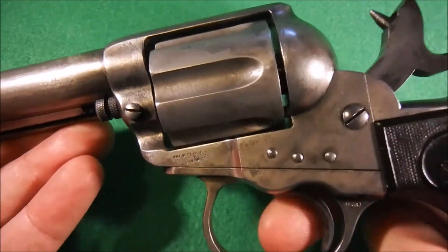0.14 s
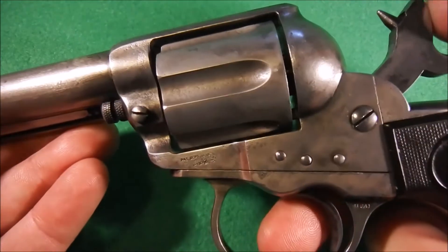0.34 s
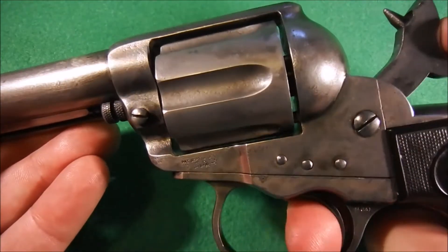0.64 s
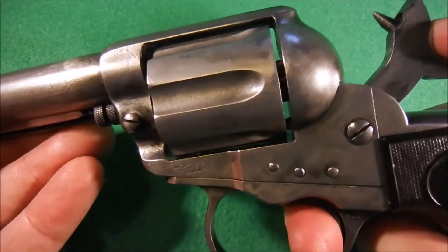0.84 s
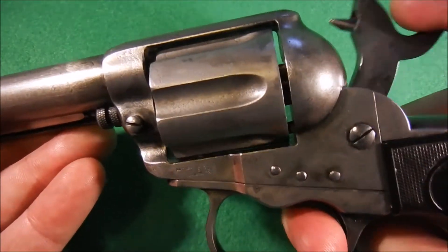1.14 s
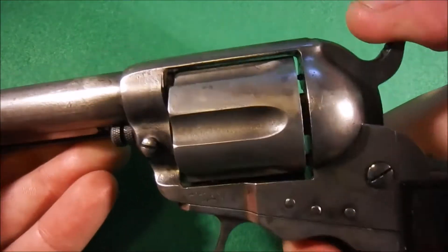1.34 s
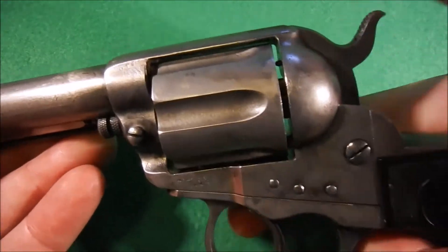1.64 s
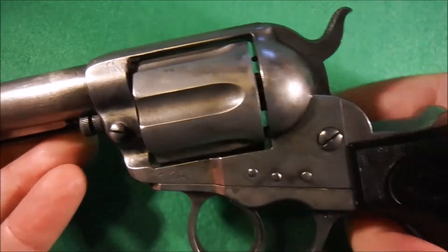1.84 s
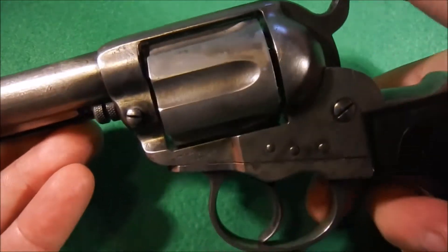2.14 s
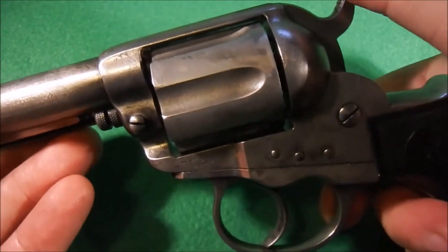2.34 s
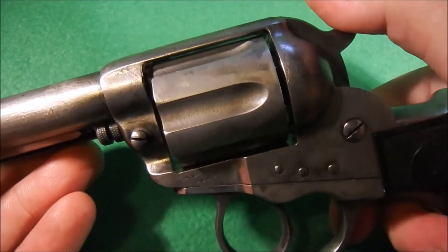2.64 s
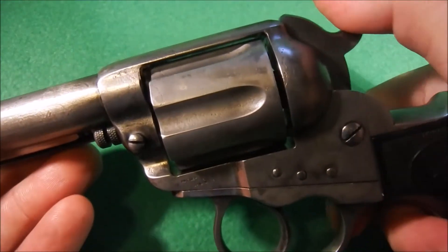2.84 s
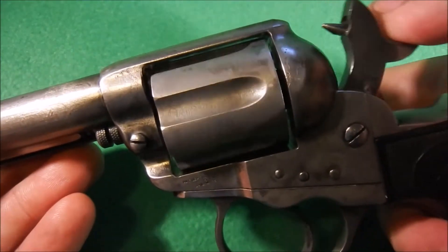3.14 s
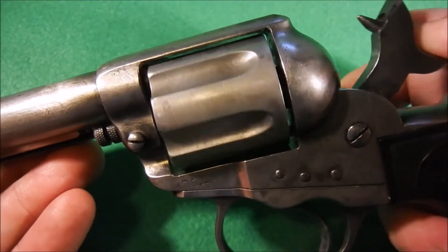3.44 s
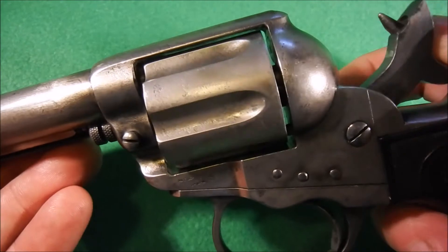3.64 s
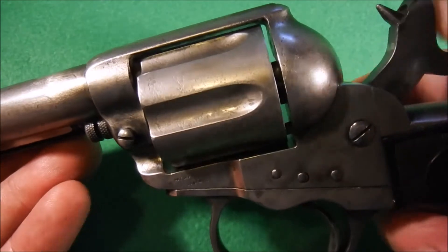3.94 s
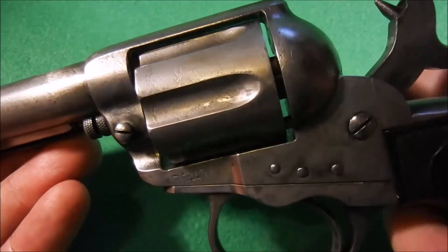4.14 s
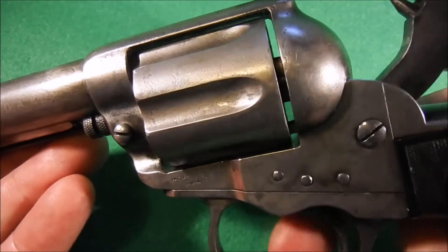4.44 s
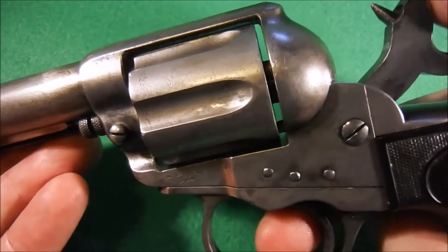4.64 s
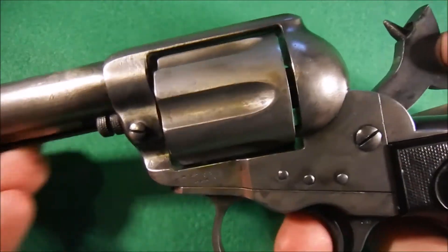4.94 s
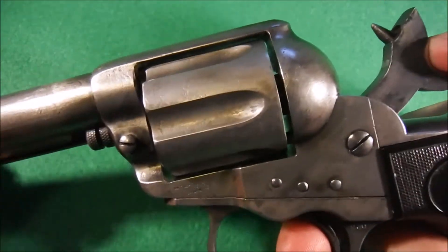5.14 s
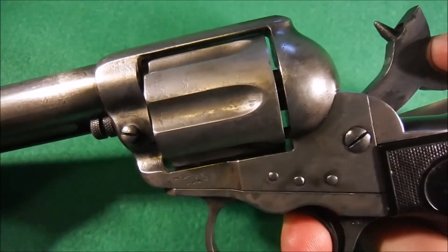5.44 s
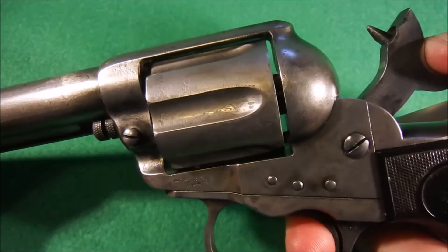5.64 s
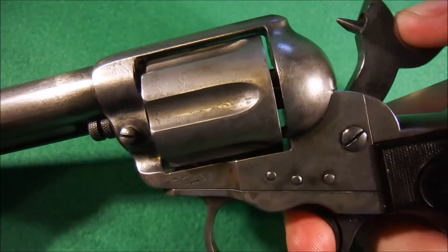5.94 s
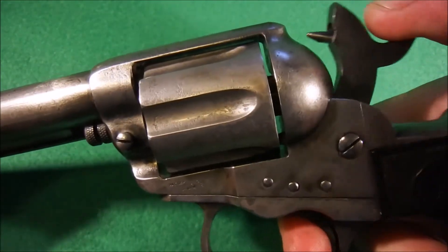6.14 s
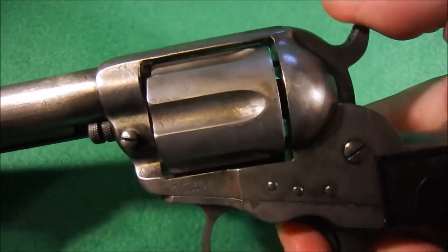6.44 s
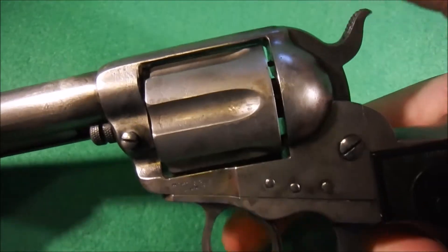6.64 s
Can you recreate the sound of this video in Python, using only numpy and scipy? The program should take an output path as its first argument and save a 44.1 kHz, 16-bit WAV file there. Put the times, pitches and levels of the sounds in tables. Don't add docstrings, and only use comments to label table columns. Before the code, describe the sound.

Close stereo pickup in a quiet room with dull wash, faint fan hum and thin hiss. A palm shuffles softly at the start; fingers rub near 0.2 s. Small lens ticks at 0.75-0.86 lead to a hard double steel click at 0.88 and 0.91. A bright slap lands at 1.43, then a lighter spring scrape and reset click at 1.68-1.71. Tinny focus ticks, about thirty a second, patter faintly until 2.4, then a calm gap. Cocking brings crisp clicks at 3.03, 3.29 and 3.73, with ticking beneath that swells towards 4.7 and fades by 5. Soft finger rubs come around 4.5 and 5.0-5.5. A tight double click snaps at 5.61-5.66, the grip shifts low at 5.9, the hammer seats sharply at 6.54, and a bright springy snap ends it at 6.73. Background drops after loud clicks, then slowly returns; echoes are short and faint.

```python
import sys
import numpy as np
from scipy import signal
from scipy.fft import rfft, irfft
from scipy.io import wavfile
from scipy.ndimage import uniform_filter1d

SR = 44100
rng = np.random.default_rng(int(sys.argv[2]) if len(sys.argv) > 2 else 0)


def undo_db(level):
    steps = np.asarray(level, float) / 20
    return 10 ** steps


def output_pcm(signal):
    pcm = np.clip(np.atleast_2d(signal).T, -1, 1) * 32767
    wavfile.write(sys.argv[1], SR, np.round(pcm).astype(np.int16))


N = 298977

# pitch_hz, left_over_right_db
PORTS = [(300, 6), (2000, -7.5), (4200, -4), (5600, 2), (9000, 5), (13000, 11), (16000, -1)]
# pitch_hz, left_over_right_db
SLOTS = [(4200, -7.5), (4800, -2), (5250, -8), (5750, 0), (6350, 11.5), (6900, -0.5), (9000, -2),
         (15000, 0)]
# pitch_hz, likeness (-1 to 1)
PORT_LIKENESS = [(60, -0.19), (130, 0.32), (290, 0.42), (640, 0.27), (1410, 0.33), (3100, -0.48),
                 (6820, 0.046), (15000, 0.04)]


def evened(x):
    return x / np.sqrt(np.mean(x ** 2) + 1e-20)


def read(points, hz):
    f, value = np.transpose(points)
    return np.interp(np.log(hz + 1), np.log(f + 1), value)


def add(mix, start_s, sound):
    part = mix[:, round(start_s * SR):][:, :sound.shape[1]]
    part += sound[:, :part.shape[1]]


def noise(colour, same=((1, 0), (2, 0)), pan=((1, 0), (2, 0)), patchy_db=0.):
    hz = np.fft.rfftfreq(1024, 1 / SR)
    a, b, c, d, patches = rng.standard_normal((N // 256 + 5, 513, 5)).T
    patches = uniform_filter1d(patches, size=10, axis=0)
    patches = evened(uniform_filter1d(patches, size=14, axis=1))
    like = np.clip(read(same, hz), -1, 1)[:, None]
    left = a + 1j * b
    right = like * left + np.sqrt(1 - like ** 2) * (c + 1j * d)
    tilt_db = np.outer([.5, -.5], read(pan, hz))
    db = (read(colour, hz) + tilt_db)[..., None] + patchy_db * patches
    below_edge = (hz < 15760)[:, None]
    spectra = np.array([left, right]) * undo_db(db) * below_edge
    return evened(signal.istft(spectra, nperseg=1024, noverlap=768)[1][:, :N])


def ring(modes, narrow, facing_db=(0, 0, 0, 0), steep=1):
    facing_hz = [3500, 6500, 10000, 14000]
    hz = abs(np.fft.fftfreq(4096, 1 / SR))
    peak_hz, width_hz, db = np.transpose(modes)[..., None]
    detune = 2 * (hz - peak_hz) / np.maximum(narrow * width_hz, 170)
    power = (undo_db(2 * db) / (1 + detune ** 2) ** steep).sum(0)
    power = power * hz ** 2 / (hz ** 2 + 2300 ** 2)
    tilt_db = read(PORTS, hz) + np.interp(hz, facing_hz, facing_db)
    log_gain = np.log(power + 1e-9) / 2 + np.log(undo_db(np.outer([.5, -.5], tilt_db)))
    spectrum = np.exp(log_gain - 1j * signal.hilbert(log_gain).imag)
    left, right = np.fft.ifft(spectrum).real[:, :1200]
    return np.array([left, np.roll(right, 1)])


def contact(chatter_ms, blow=22, rise=0.025):
    u = np.arange(600) / SR / (chatter_ms / 1000)
    impacts = rng.standard_normal(600) ** 3
    return blow * (u == 0) + impacts * (1 - np.exp(-u / rise)) * np.exp(-u)


def quiet_room():
    # pitch_hz, density_db per Hz
    wash = [(30, -47), (60, -16), (115, -9), (160, -4), (260, -2.5), (500, -4), (800, -7.5), (1300, -2.5),
            (1900, -8), (2250, -16.5), (3000, -14), (4300, -19.5), (5500, -34.5), (7000, -37),
            (10000, -56.5)]
    # pitch_hz, left_over_right_db
    wash_pan = [(200, 1), (1300, -2), (2800, -0.5), (4200, -8.5), (6200, 21), (8000, -4.5)]
    # pitch_hz, density_db per Hz
    hiss = [(3000, -23.5), (6600, -10), (6900, -19), (7150, -9.5), (7450, -15), (7800, -7), (10000, -4),
            (15500, 1.5)]
    # pitch_hz, level_db rms
    fan_lines = [(120, -68), (248, -68.5), (398, -76), (500, -68.5)]
    t = np.arange(N) / SR

    def waver():
        slow = uniform_filter1d(rng.standard_normal(N), size=4000)
        return evened(uniform_filter1d(slow, size=4000))

    out = undo_db(-53) * noise(wash, PORT_LIKENESS, wash_pan, patchy_db=1.5)
    out += undo_db(-64) * noise(hiss, pan=SLOTS, patchy_db=1.5)
    for hz, db in fan_lines:
        out += undo_db(db + 0.5 + 3.0 * waver()) * np.sin(2 * np.pi * hz * t + 1.6 * waver())
    return out


def gain_control_db():
    # start_s, depth_db
    dips = [(.88, -6.5), (.912, -23.5), (1.431, -23), (1.71, -18), (3.034, -14), (3.289, -15),
            (3.734, -12.5), (4.782, 3), (5.614, -6), (5.656, -13), (6.537, -18.5), (6.736, -42)]
    fall_s, hold_s, recover_db_per_s = 0.0067, 0.065, 15
    start_s, depth_db = np.transpose(dips)[..., None]
    since = np.maximum(np.arange(N) / SR - start_s, 0)
    fall = depth_db * (1 - np.exp(-since / fall_s))
    recovery = recover_db_per_s * np.maximum(since - hold_s, 0)
    return np.minimum((fall + recovery).min(0), 0)


def lens_drive():
    # pitch_hz, width_hz, level_db
    case = [(4260, 144, -4.5), (4223, 98, 2.5), (3650, 250, -8), (8100, 1000, -20), (1600, 210, -2)]
    # pitch_hz, density_db per Hz
    whir_colour = [(3000, -32), (3700, -15.5), (4100, -4), (4300, 0), (4600, -8.5), (5200, -32)]
    # start_s, level_db
    first_hunt = [(0.758, -54), (0.79, -52), (0.8255, -45), (0.8581, -49.5), (0.9568, -72), (0.9939, -79.5),
                  (1.0229, -79.5), (1.06, -76.5), (1.0915, -72), (1.1267, -76), (1.1586, -68), (1.193, -73),
                  (1.2255, -67), (1.26, -65.5), (1.2916, -70), (1.325, -66.5), (1.3556, -83.5),
                  (1.3908, -72), (1.4609, -73), (1.493, -65.5), (1.5268, -74), (1.559, -76), (1.5933, -69),
                  (1.6242, -73.0), (1.6577, -72), (1.7228, -58), (1.7604, -70), (1.7926, -73),
                  (1.826, -64.5), (1.8598, -65.5), (1.895, -64.5), (1.9267, -63), (1.959, -66),
                  (1.991, -63.5), (2.024, -67), (2.0605, -59), (2.0934, -58), (2.1262, -59.5),
                  (2.1592, -58.5), (2.192, -61), (2.2263, -61), (2.26, -63.0), (2.2927, -63),
                  (2.3268, -56.5), (2.3621, -89), (2.3933, -56.5)]
    # start_s, level_db
    second_hunt = [(3.061, -66), (3.093, -63.5), (3.129, -59), (3.1613, -64), (3.1954, -57.5),
                   (3.2265, -53), (3.2606, -65), (3.3297, -61), (3.3588, -91), (3.3936, -60),
                   (3.4276, -57.5), (3.4599, -63.5), (3.493, -63.5), (3.5283, -59.5), (3.5579, -72.5),
                   (3.596, -59.0), (3.6276, -60), (3.661, -61), (3.6962, -57.5), (3.7633, -58.5),
                   (3.7943, -63.5), (3.8278, -58), (3.8608, -65), (3.8944, -61), (3.9276, -60),
                   (3.9621, -55), (3.9961, -58.5), (4.06, -54.5), (4.0925, -58.5), (4.1257, -58),
                   (4.1618, -53.5), (4.1945, -51.5), (4.2273, -58), (4.2607, -55.5), (4.2964, -48.5),
                   (4.3277, -50.5), (4.3645, -61), (4.3963, -51), (4.427, -52.5), (4.4615, -51),
                   (4.4959, -53), (4.5265, -56), (4.5625, -47.5), (4.5945, -45), (4.629, -47.5),
                   (4.6617, -46), (4.693, -57), (4.7275, -47.5), (4.7452, -50.5), (4.759, -62),
                   (4.8257, -65), (4.8643, -67.5), (4.8924, -78.0), (4.9283, -77), (4.964, -51),
                   (4.9986, -68)]
    out, whir, t = np.zeros((2, N)), np.zeros(N), np.arange(N) / SR
    bodies = []
    for shift in (-0.026, 0, 0, 0.026):
        modes = [(hz * (1 + shift), width_hz, db) for hz, width_hz, db in case]
        bodies.append(ring(modes, narrow=0.93, steep=1.11))
    for start_s, db in first_hunt + second_hunt:
        step = contact(1.6, blow=8, rise=0.31)[:400]
        shudder = 0.23 * contact(2.7, blow=0, rise=1.0)
        body = bodies[rng.integers(len(bodies))]
        buzz = signal.fftconvolve(np.concatenate([step, shudder])[None], body, axes=1)
        crest = np.sqrt(uniform_filter1d(buzz.mean(0) ** 2, size=88).max())
        add(out, start_s - .0015, undo_db(db) * buzz / crest)
    for hunt in (first_hunt, second_hunt):
        whir += undo_db(np.interp(t, *np.transpose(hunt), -200, -200))
    whir_noise = noise(whir_colour, same=[(3000, 0.84), (5000, 0.85)], pan=PORTS, patchy_db=6.0)
    out += whir * undo_db(-16.5) * whir_noise
    return signal.sosfilt(signal.butter(4, 11000, fs=SR, output="sos"), out)


def strokes(rows, fade_db):
    t, out = np.arange(N) / SR, np.zeros(N)
    for start_s, length_s, db, share in rows:
        end_s = start_s + length_s
        swell_db = np.interp(t, [start_s, start_s + share * length_s, end_s], [fade_db, 0, fade_db])
        out += undo_db(db + swell_db) * np.clip(np.minimum(t - start_s, end_s - t) / 0.0094, 0, 1)
    return out


def hands():
    # start_s, length_s, peak_db, share before the peak
    rubs = [(.15, 0.19, -63.5, 0.36), (1.32, 0.18, -75.5, 0.56), (1.84, 0.19, -80, 0.36),
            (4.44, 0.35, -70.5, 0.1), (5.04, 0.15, -65.5, 0.66), (5.28, 0.26, -66, 0.37),
            (6.05, 0.2, -75.5, 0.23), (6.21, 0.14, -73, 0.27), (6.37, 0.22, -71, 0.21)]
    # pitch_hz, density_db per Hz
    rub_colour = [(800, -37), (2200, -11), (4200, -4.5), (6000, -11.5), (8500, -9.5), (12000, -17),
                  (15500, -26)]
    # start_s, length_s, peak_db, share before the peak
    shuffles = [
        (-.1, 1, -55, 0.55),
        (5.89, 0.373, -58.5, 0.16),
    ]
    shuffle_colour = [(120, -28.0), (190, -13.5), (260, -4.0), (360, -10), (520, -15.0),
                      (900, -20), (3000, -48.0)]
    slide = noise(rub_colour, pan=SLOTS, patchy_db=3.0)
    shuffle = noise(shuffle_colour, same=PORT_LIKENESS, patchy_db=1.0)
    return undo_db(11.0) * strokes(rubs, -15) * slide + strokes(shuffles, -3.5) * shuffle


def flattened(drive):
    z = rfft(np.pad(drive, (40, 384)))
    return irfft(z / np.sqrt(uniform_filter1d(abs(z) ** 2, size=21)))[:640]


def strike(db, chatter_ms, thump_db, knock_db, pan_db, body):
    drive = flattened(contact(chatter_ms + 0.15))
    sound = signal.fftconvolve(drive[None], body, axes=1)
    sound /= -abs(sound.mean(0)).max()
    t = np.maximum(np.arange(sound.shape[1]) - 40, 0) / SR
    push = 3600 * t * np.exp(1 - 3600 * t)
    knock = np.sin(2 * np.pi * 1200 * t) * np.exp(-np.pi * 330 * t)
    low = undo_db(thump_db) * push + undo_db(knock_db) * knock
    return undo_db(db + pan_db * np.array([[.5], [-.5]])) * (sound + low * [[.9], [1.1]])


def steel_part(modes, hits, chatter_ms, knock_db, knock_per_thump, facing_db):
    out = np.zeros((2, N))
    for start_s, db, thump_db, pan_db, bright_db in hits:
        tilted = [(hz, width_hz, mode_db + bright_db * np.log2(hz / 4200))
                  for hz, width_hz, mode_db in modes]
        body = ring(tilted, narrow=1.4, steep=1.05, facing_db=facing_db)
        hit_knock_db = knock_db + knock_per_thump * (thump_db + 30)
        add(out, start_s - 40 / SR, strike(db, chatter_ms, thump_db, hit_knock_db, pan_db, body))
    return out


def sear():
    # pitch_hz, width_hz, level_db
    modes = [(4255, 210, -1), (5930, 250, -23.5), (6400, 220, -12), (8150, 550, -9.5), (9800, 400, -21),
             (11230, 700, -16), (13200, 500, -17.5)]
    # start_s, peak_db, thump_db, left_over_right_db, brightness_db per octave
    hits = [
        (0.826, -51, -25.5, 2.5, -2.5),
        (.856, -55, -26, 3, -7),
        (0.8792, -19.5, -18.5, -5, 0.5),
        (0.8803, -20, -37.5, -5.5, -1.5),
        (5.6143, -13, -31.5, -4, -2),
        (5.6144, -23, -39, 0, -2),
    ]
    return steel_part(modes, hits, 1, -23, 0.32, [-3, 1.5, 0, 3.5])


def trigger():
    # pitch_hz, width_hz, level_db
    modes = [(2530, 290, -12), (3500, 810, -11.5), (4300, 210, 3.5), (5370, 270, -15), (7700, 1400, -11),
             (9500, 350, -29.5), (11600, 970, -13.5), (15200, 890, -15)]
    # start_s, peak_db, thump_db, left_over_right_db, brightness_db per octave
    hits = [
        (0.9105, -44.5, -9, -6, 0.015),
        (0.912, -12, -10.5, -3, 0.00065),
    ]
    return steel_part(modes, hits, 1.3, -12.5, 0, [-1, -4, -0.5, 2.5])


def bolt():
    # pitch_hz, width_hz, level_db
    modes = [(2647, 124, -1.5), (4130, 320, 2.5), (6290, 130, -8), (7880, 180, -6), (8700, 250, -10),
             (9700, 200, -14.5), (10900, 340, -12.5), (11900, 610, -16), (14000, 600, -19.5),
             (15330, 780, -15.5)]
    # start_s, peak_db, thump_db, left_over_right_db, brightness_db per octave
    hits = [
        (5.6544, -10.5, -23, -5.5, 0.21),
        (5.66, -24.5, -27, 9, -0.21),
        (5.669, -33.5, -21, -5, -0.79),
    ]
    return steel_part(modes, hits, 1.7, -11, 0.38, [.1, 5, 2.1, 1.1])


def safety():
    # pitch_hz, width_hz, level_db
    modes = [(2940, 390, -2.5), (4170, 310, 1), (4640, 190, -8.5), (5300, 210, -9), (5890, 300, -9.5),
             (6690, 400, -1.5), (7780, 650, -3), (9050, 450, 1), (11400, 710, -4.5), (13400, 680, -12),
             (14200, 190, -10), (14600, 180, -13.5)]
    # start_s, peak_db, thump_db, left_over_right_db, brightness_db per octave
    hits = [
        (1.4307, -13.5, -34.5, -4.5, 0.0049),
    ]
    return steel_part(modes, hits, 1, -25, 0, [.1, 5.2, 3.1, 3.1])


def hammer_seat():
    # pitch_hz, width_hz, level_db
    modes = [(2920, 150, -3), (4090, 810, -2.5), (5360, 270, -8), (6100, 250, -3), (6600, 160, -9),
             (7220, 330, -3), (8260, 380, -2), (10700, 980, -5), (13200, 270, -27), (14200, 290, -17),
             (15000, 610, -11), (15700, 560, -9)]
    # start_s, peak_db, thump_db, left_over_right_db, brightness_db per octave
    hits = [
        (6.5373, -13.5, -23, -5.5, 0.0027),
    ]
    return steel_part(modes, hits, 0.31, -14, 0, [-2, 3, 3.5, -1])


def trigger_spring():
    # pitch_hz, width_hz, level_db
    modes = [(3440, 290, -4), (3760, 89, 6), (4380, 270, 4), (6440, 270, 1.5), (8200, 450, 3),
             (9050, 490, -0.5), (10300, 460, -3), (11300, 280, -3), (13330, 600, -9.5)]
    # start_s, peak_db, thump_db, left_over_right_db, brightness_db per octave
    hits = [(1.613, -49, -21.5, -5, 5), (1.6356, -54, -26, 0, 7), (1.657, -61, -37, 5, 0),
            (1.6823, -25.5, -41, 9, 5.5), (1.685, -28, -36, -1, -4.5), (6.6914, -44, -17.5, -3.5, 5.5),
            (6.695, -55, -30, 1, 4), (6.703, -56, -30, -3, 3), (6.707, -42, -28, -6, 10),
            (6.7171, -56, -31, -13, -1), (6.7287, -27, -37, -5, 6), (6.7309, -15, -38.5, 3, 4),
            (6.733, -24.5, -31, -6, -1)]
    return steel_part(modes, hits, 0.9, -19, 0.99, [-3.5, 2, -2, -1])


def trigger_reset():
    # pitch_hz, width_hz, level_db
    modes = [(2800, 95, 6), (4270, 230, 7), (6470, 220, -2), (8000, 210, -15), (8030, 440, -10.5),
             (9600, 620, -7.5), (11100, 230, -16), (12720, 1000, -15), (14560, 270, -14.5)]
    # start_s, peak_db, thump_db, left_over_right_db, brightness_db per octave
    hits = [
        (1.706, -24.5, -50, -15.5, 3),
        (1.7089, -25, -60, 0.5, 3),
        (1.7101, -23.5, -34, 11.5, 4),
        (6.7352, -29.5, -60, 0.5, 0.5),
        (6.7361, -11.5, -33, -4.5, 0.5),
    ]
    return steel_part(modes, hits, 0.97, -11, 1, [1, 8, -2, 8])


def first_notch():
    # pitch_hz, width_hz, level_db
    modes = [(2920, 300, -4), (3970, 280, 0.5), (5220, 250, -9), (7100, 300, -24), (7750, 240, -3.5),
             (9100, 420, 1.5), (11280, 620, -1), (13400, 800, -10.5), (14830, 660, -8)]
    # start_s, peak_db, thump_db, left_over_right_db, brightness_db per octave
    hits = [
        (3.0348, -10.5, -22, 0.65, 0.008),
    ]
    return steel_part(modes, hits, 0.62, -31.5, 0, [-4, -4, -22.5, 9.5])


def half_notch():
    # pitch_hz, width_hz, level_db
    modes = [(2930, 190, -9.5), (3880, 220, -0.5), (4590, 150, 0.5), (5340, 200, -3), (5900, 220, -4),
             (7100, 270, -5.5), (9700, 870, -2), (10900, 990, -0.5), (13800, 400, -22), (15580, 720, -10)]
    # start_s, peak_db, thump_db, left_over_right_db, brightness_db per octave
    hits = [
        (3.2806, -40, -24, 1.5, -11.5),
        (3.2905, -17, -42, 1.6, 0),
    ]
    return steel_part(modes, hits, 0.67, -22.5, 0, [-4, -6, -17.5, 12.5])


def creep():
    # pitch_hz, width_hz, level_db
    modes = [(2920, 170, 8), (4170, 180, 9), (6300, 500, -10), (8250, 660, -4), (10800, 1000, -13)]
    # start_s, peak_db, thump_db, left_over_right_db, brightness_db per octave
    hits = [
        (3.642, -58, -30, 0, 3),
        (3.9595, -55, -27, 10, 0),
        (4.0197, -48, -14, 4, 1),
        (4.0275, -55, -23, -2, 1),
        (4.151, -53, -25, 0, -2),
        (4.7925, -47, -40, -4, 2),
    ]
    return steel_part(modes, hits, 2.5, -9, 0.33, [.1, .1, .1, .1])


def full_notch():
    # pitch_hz, width_hz, level_db
    modes = [(2800, 1100, -10.5), (3660, 170, -1), (4200, 110, 0), (5030, 220, 0), (6110, 130, -0.5),
             (7700, 240, -7), (8470, 270, -3), (9700, 300, -7), (11450, 500, -9), (12900, 300, -18),
             (14070, 600, -15)]
    # start_s, peak_db, thump_db, left_over_right_db, brightness_db per octave
    hits = [
        (3.734, -12.5, -24.5, -5.5, -0.5),
    ]
    return steel_part(modes, hits, 0.45, -24.5, 0, [2.5, 2.4, .1, 4.4])


def revolver():
    lock = sear() + trigger() + bolt() + safety()
    hammer = first_notch() + half_notch() + full_notch() + creep() + hammer_seat()
    return lock + hammer + trigger_spring() + trigger_reset()


def echo(x):
    t60_s, delay_s = 0.2, 0.005
    t = np.arange(SR // 3) / SR
    tail = rng.standard_normal((2, len(t))) * undo_db(-60 * t / t60_s) * (t > delay_s)
    tail = signal.lfilter([1], [1, -0.65], tail)
    return signal.fftconvolve(x, tail / np.linalg.norm(tail[0]), axes=1)[:, :N]


def scene():
    background = undo_db(gain_control_db()) * quiet_room()
    steel = revolver()
    return background + lens_drive() + hands() + undo_db(-30.5) * echo(steel) + steel


def treble_dropouts(x):
    # start_s, length_s, lowest_lost_hz
    gaps = [(.886, .021, 9500), (.897, .01, 4900), (1.667, .012, 1000), (1.69, .006, 7500),
            (1.696, .006, 13000), (5.62, .014, 11500), (5.625, .009, 5000), (6.722, .004, 2500),
            (6.7405, .0065, 4800), (3.714, .007, 5000), (3.273, .006, 5000)]
    out = x.copy()
    margin = 500
    for start_s, length_s, edge_hz in gaps:
        start, n = round(start_s * SR), round(length_s * SR)
        highpass = signal.butter(4, edge_hz, "high", fs=SR, output="sos")
        treble = signal.sosfiltfilt(highpass, out[:, start - margin:start + n + margin])
        out[:, start:start + n] -= signal.windows.tukey(n, .3) * treble[:, margin:-margin]
    return out


def band_limit(x):
    return signal.sosfilt(signal.butter(12, 16600, fs=SR, output="sos"), x)


def record(dry):
    # pitch_hz, width_hz
    notches = [(2490, 95), (2500, 92), (4820, 150), (4900, 160), (4970, 190), (5050, 160), (5220, 110),
               (7500, 97), (7505, 76)]
    for hz, width_hz in notches:
        dry = signal.lfilter(*signal.iirnotch(hz, hz / width_hz, SR), dry)
    limit = signal.firwin(61, 16100, window=("kaiser", 7), fs=SR)
    mix = treble_dropouts(signal.oaconvolve(dry, limit[None], "same"))
    return band_limit(mix)


dry = scene()
out = record(dry)
output_pcm(out)
```